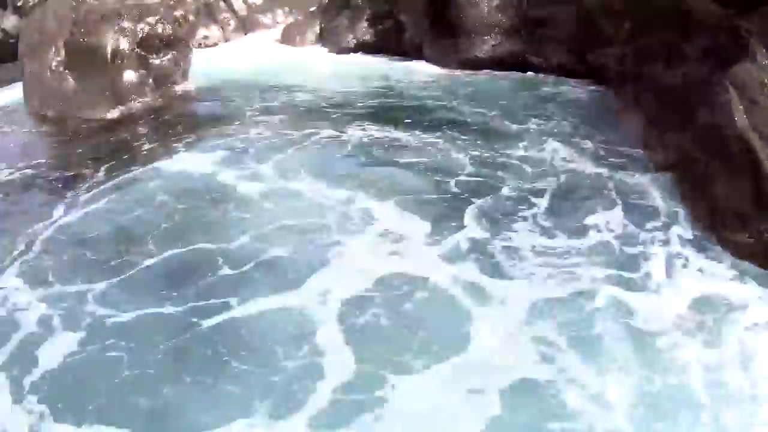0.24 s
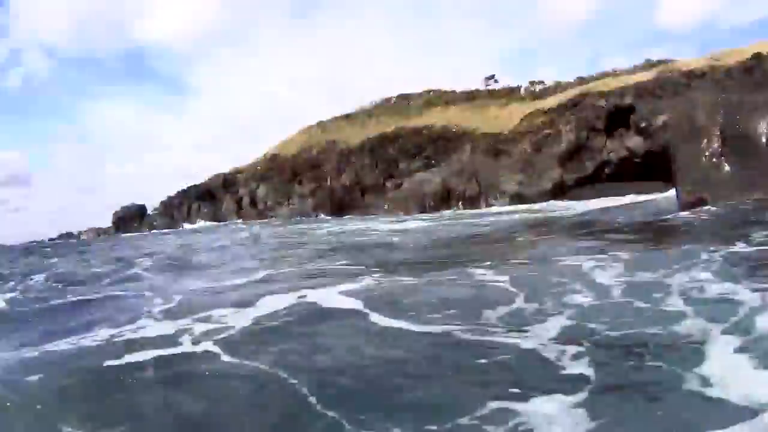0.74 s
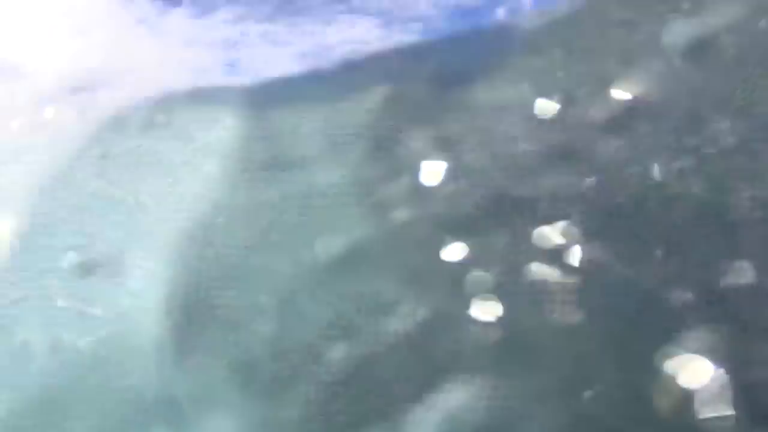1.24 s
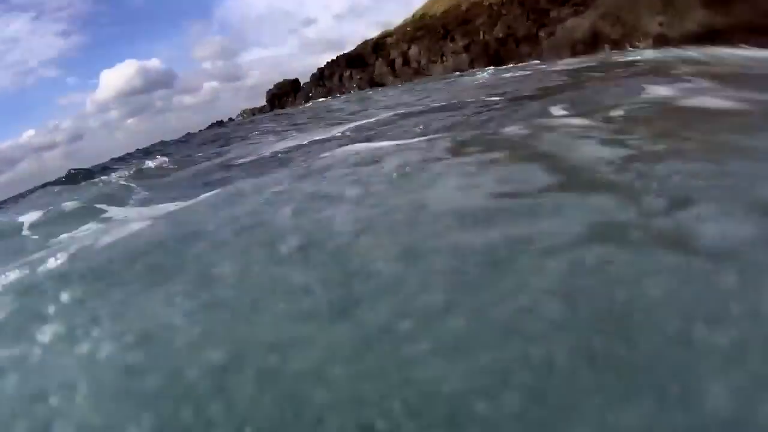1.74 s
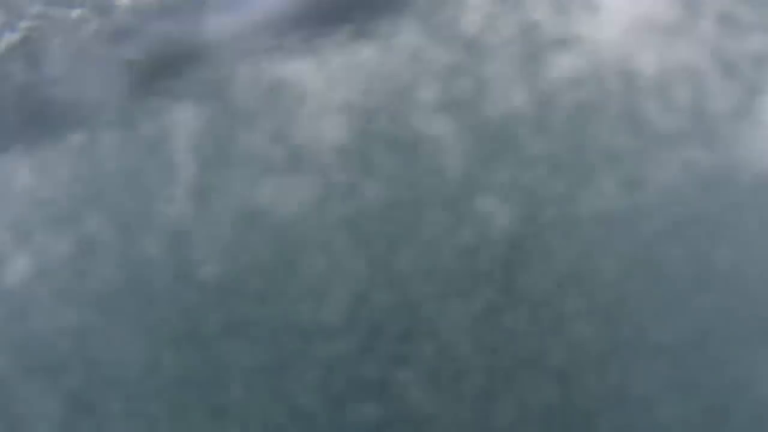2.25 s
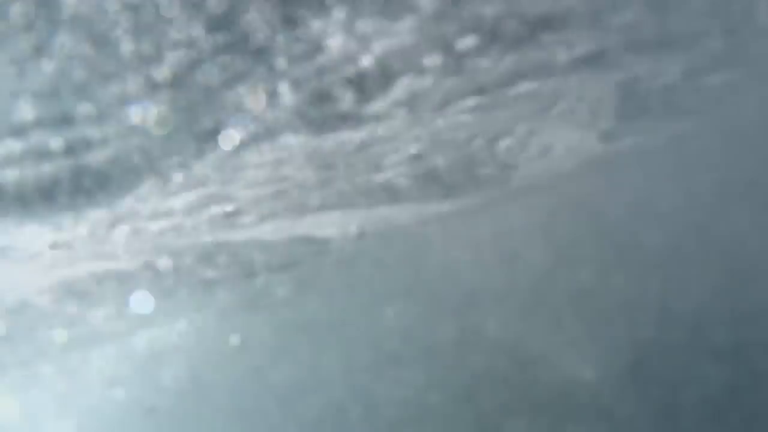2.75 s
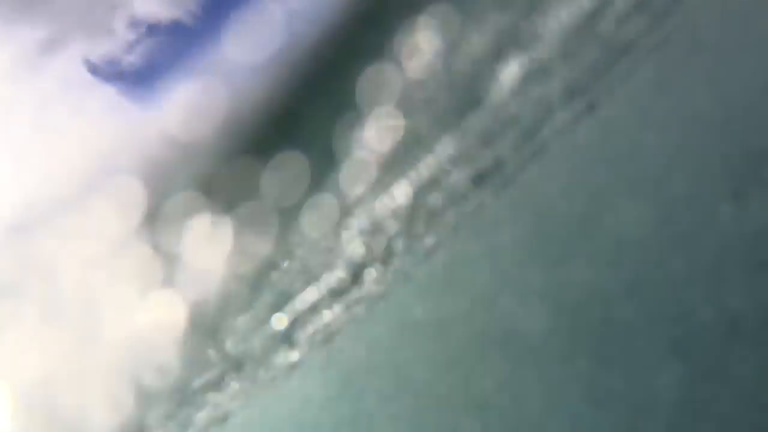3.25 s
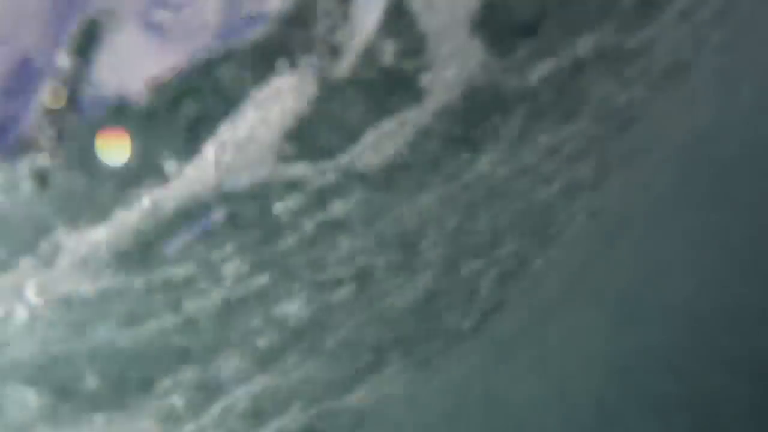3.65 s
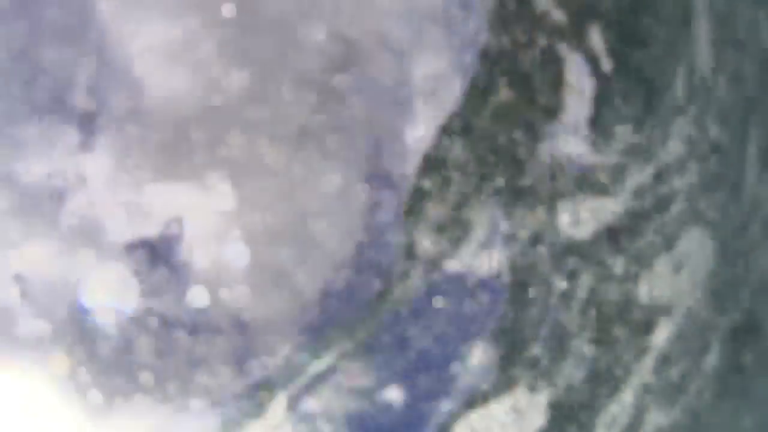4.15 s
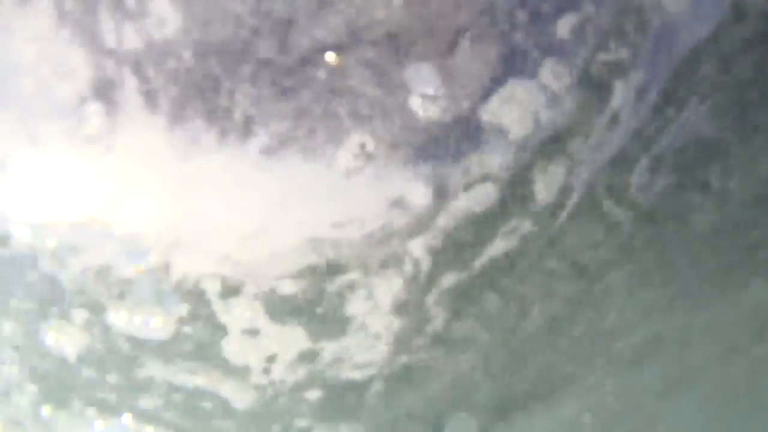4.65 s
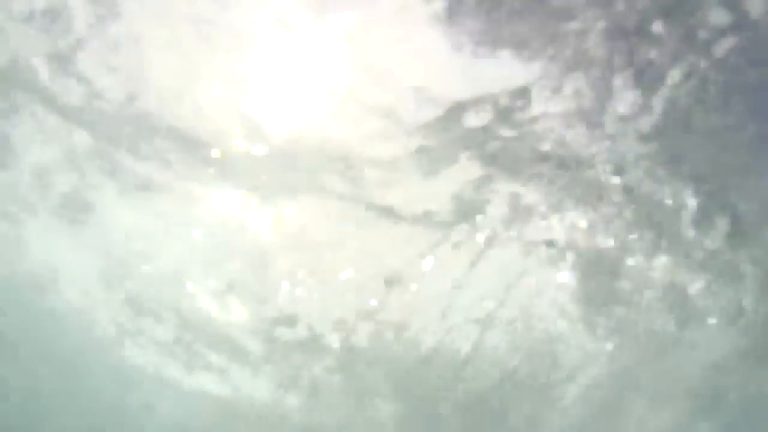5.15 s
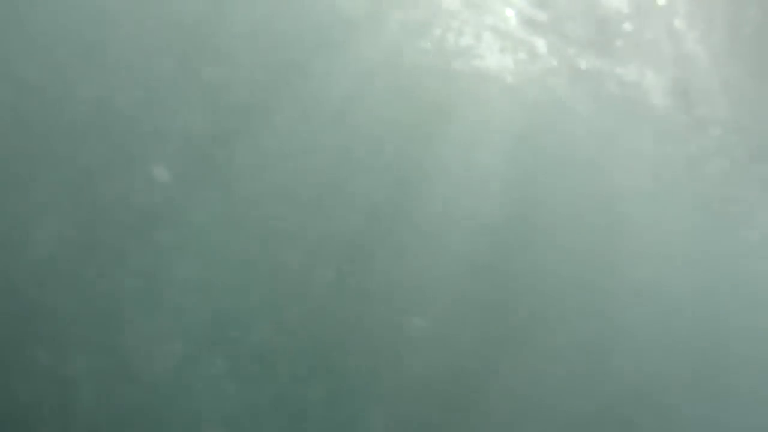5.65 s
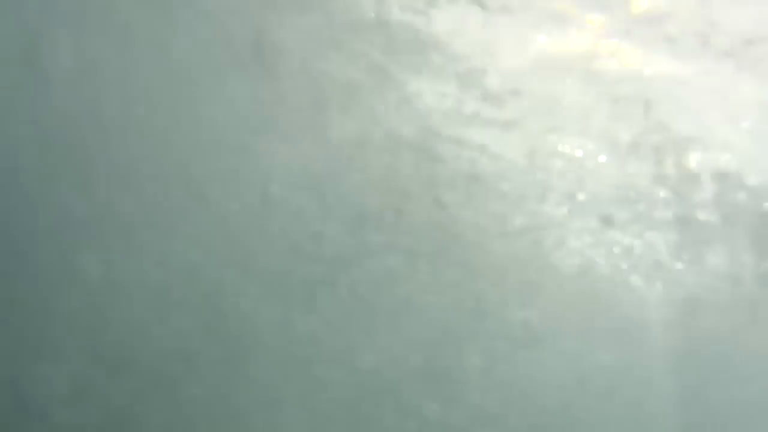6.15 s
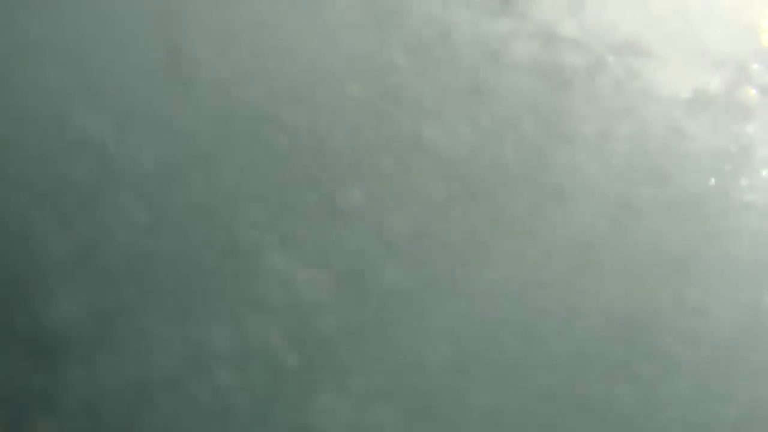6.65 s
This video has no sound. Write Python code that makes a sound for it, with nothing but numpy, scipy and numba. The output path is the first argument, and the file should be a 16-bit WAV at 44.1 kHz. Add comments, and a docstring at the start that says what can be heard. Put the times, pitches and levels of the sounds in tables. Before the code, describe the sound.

Surf hisses over rocks with soft thuds and drop ticks, then a slap and bubbles plunge everything into muffled, booming, crackling underwater gurgle.

```python
"""Surf, then under the wave

Surf hisses over rocks, as filtered noise and impulses; wind and slops thud, drops of spray tick on a waterproof
case at the waterline. A wave slaps over it and it sinks in a string of bubbles, each a decaying sine.
Under water the churning foam booms through a resonance, the air trapped at the microphone port,
while small bubbles fizz and crack against the case as blips, filtered noise and ringing impulses."""
import sys
import numpy as np
from scipy import signal
from scipy.fft import rfft, irfft, next_fast_len
from scipy.io import wavfile
from scipy.ndimage import uniform_filter1d, minimum_filter1d
from numba import njit

SR = 44100
rng = np.random.default_rng(int(sys.argv[2]) if len(sys.argv) > 2 else 0)


def int16_out(signal):
    """Quantize to a 16-bit WAV file."""
    q = np.round(np.clip(np.atleast_2d(signal).T, -1, 1) * 32767)
    wavfile.write(sys.argv[1], SR, q.astype(np.int16))


N = 303849
T = np.arange(N) / SR  # time of every sample [s]
CLOSES_AGAIN_S = 1.8   # water closes over the port for good
PINCH_S = 0.0012       # time a bubble takes to pinch off

# fizz on the case: (time [s], relative body level [dB], relative sparkle level [dB])
FIZZ_LEVEL = [(1.2, -18, -30), (1.37, -30, -58), (1.5, -32, -47), (1.88, -39, -47), (2.06, -33, -55),
              (2.33, -41, -46), (2.65, -43, -45.5), (3.0, -39.5, -48.5), (3.17, -37, -42),
              (3.55, -35.5, -45), (3.85, -36.5, -45.5), (4.08, -44.5, -49), (5.0, -47, -51),
              (5.09, -35.5, -54.5), (5.27, -36, -53.5), (5.56, -47, -52), (6.02, -45.5, -48),
              (6.25, -47.5, -44), (6.89, -34.5, -45.5)]


def undb(db):
    """Decibels to gain."""
    return 10 ** (np.asarray(db) / 20)


def unit(x):
    """Scale to rms 1."""
    return x / np.sqrt(np.mean(x ** 2))


def curve(rows):
    """Each column of a (time [s], ..) table at every sample."""
    s, *columns = np.transpose(rows)
    return [np.interp(T, s, c) for c in columns]


def add(out, s, sound):
    """Mix a short sound in at time s."""
    i = max(int(s * SR), 0)
    out[..., i:i + sound.shape[-1]] += sound[..., :max(N - i, 0)]


def walk(rate):
    """Smooth chance with spread near 1, heading for a new value rate times a second."""
    steps = rng.standard_normal(4096)
    return 1.3 * np.interp(T * rate, np.arange(len(steps)), steps)


def colour(x, points, size=4096):
    """Minimum-phase filter with the given (frequency [Hz], gain [dB]) response."""
    hz, db = np.transpose(points)
    gain = undb(np.interp(np.log(np.fft.rfftfreq(size, 1 / SR) + 1), np.log(hz), db))
    # folding the cepstrum forward in time makes the filter causal
    cepstrum = irfft(np.log(gain))
    cepstrum[1:size // 2] *= 2
    cepstrum[size // 2 + 1:] = 0
    response = irfft(np.exp(rfft(cepstrum)))
    return np.apply_along_axis(lambda v: signal.fftconvolve(v, response)[:len(v)], -1, x)


@njit
def svf(x, g, k):
    """State-variable band-pass with a moving centre."""
    y, band, low = np.empty(len(x)), 0., 0.
    for i in range(len(x)):
        v = (band + g[i] * (x[i] + 1e-18 - low)) / (1 + g[i] * (g[i] + k))
        band, low, y[i] = 2 * v - band, low + 2 * g[i] * v, k * v
    return y


def ring(x, hz, q):
    """One resonance, gain 1 at its centre."""
    g = np.tan(np.pi * np.minimum(hz, SR / 3) / SR) * np.ones(x.shape[-1])
    return np.apply_along_axis(svf, -1, x, g, 1. / q)


def pops(rate, spread_db):
    """Random impulses, rate a second on average, with exponentially scattered dB sizes; rms 1."""
    chance = rng.random(N)
    size = np.minimum(rng.exponential(size=N), 4.5)
    return unit((chance < rate / SR) * undb(spread_db * size) * rng.choice([-1, 1], N))


def spread(mid, side):
    """Left and right from mid and side."""
    return np.array([mid + side, mid - side])


def bubble(hz, swell, decay, lag_s, rise=0.018):
    """A bubble swells as it pinches off, then rings down while its pitch bends by rise per decay (in cycles)."""
    cycles = np.arange(int((swell + 6 * decay) * SR / hz) + 2) * hz / SR
    age = np.maximum(cycles - swell, 0) / decay
    size = np.sin(np.pi / 2 * np.minimum(cycles / swell, 1)) ** 2 * np.exp(-age)
    phase = np.cumsum(1 + rise * age) * hz / SR
    lead = np.tanh(2 * np.pi * hz * lag_s) / 2  # it reaches one microphone first
    return size * np.sin(spread(2 * np.pi * phase, lead))


def swarm(low_hz, high_hz, spread_db, cycles, lag_s, count):
    """Chance bubbles of every pitch in a range, a few cycles long, most of them faint; rms 1."""
    out = np.zeros((2, N))
    for when, pitch, size, life, side in rng.random((count, 5)):
        hz = low_hz * (high_hz / low_hz) ** pitch
        db = spread_db * min(-np.log(size), 4.5)
        swell = cycles * (.5 + life)
        plop = bubble(hz, swell, swell / 2, lag_s * (2 * side - 1))
        add(out, when * N / SR, undb(db) * plop)
    return unit(out)


def lift():
    """Troughs bring the case nearer the surface, so the pocket rings higher: its rise in octaves."""
    # wave troughs: (time [s], half length [s], rise [octaves])
    troughs = [(2.313, 0.084, 0.57), (3.054, 0.12, 0.27), (3.326, 0.16, 0.13)]
    return sum(octaves * np.exp(-((T - s) / half_s) ** 2) for s, half_s, octaves in troughs)


def port_pitch(closing_s=0.23, glide_s=0.031):
    """The air in the port rings high while open and low once sealed, settling lower as the case sinks."""
    open_hz, sealed_hz, deep_hz, settle_s = 1280, 546, 480, 1.22
    closes_s, drains_s = 1.37, 1.54  # water covers the port, then drains off once
    sealed, = curve([(closes_s - closing_s, 0), (closes_s, 1),
                     (drains_s - glide_s, 1), (drains_s, 0),
                     (CLOSES_AGAIN_S - glide_s, 0), (CLOSES_AGAIN_S, 1)])
    sinking = np.exp(-np.maximum(T - closes_s, 0) / settle_s)
    pocket_hz = deep_hz + (sealed_hz - deep_hz) * sinking
    return open_hz + sealed * (pocket_hz * 2 ** lift() - open_hz)


def surf(port_hz, left_db=-0.7):
    """Countless bursting bubbles on the rocks merge into a hiss that rings the port."""
    # spectrum of the hiss: (frequency [Hz], relative gain [dB])
    surf_colour = [(30, -22), (60, -31), (110, -24.5), (220, -15), (310, -19), (420, -14.5), (700, -14.5),
                   (1000, -17), (1350, -5.5), (1800, -8), (2050, -12.5), (2350, -6), (3500, -16),
                   (4750, -12.5), (7000, -24), (11000, -43.5)]
    # stereo width: (frequency [Hz], side minus mid [dB])
    surf_width = [(60, -21), (110, -22), (190, -23), (340, -28.5), (600, -11), (740, -9), (1110, -17),
                  (2100, -5), (3550, -12), (4600, -35.5), (6350, -9), (11400, -18.5)]
    # the surf is shut out as the wave covers the case: (time [s], relative level [dB])
    surf_level = [(0, -26.5), (.35, -31.5), (1.22, -30.5), (1.25, -37), (1.35, -29.5), (1.41, -91),
                  (2, -100)]
    mid, side = (rng.standard_normal(N) + 0.61 * pops(rate=2200, spread_db=4.0) for _ in range(2))
    hiss = colour(spread(mid, colour(side, surf_width)), surf_colour)
    hiss = hiss + 1.6 * ring(hiss, port_hz, q=18)
    waver_db = .8 * walk(18)
    level_db = curve(surf_level)[0] + waver_db
    return unit(hiss) * undb(spread(level_db, left_db / 2))


def fizz(body_db=-1, sparkle_db=-1, split_hz=2500):
    """Pitched blips over a soft wash of foam on the case; body and sparkle swell independently."""
    # tint of the foam: (frequency [Hz], relative gain [dB])
    fizz_colour = [(200, -5), (800, -0.5), (980, -1.5), (1150, -5), (1350, -3.5), (1560, -8), (1850, 3),
                   (2500, -7.5), (3000, -1), (3450, -5), (4000, 0), (5500, -14), (7600, -24.5),
                   (9200, -33.5), (11000, -48)]
    out = 0
    blips = swarm(low_hz=900, high_hz=7000, spread_db=3.4, cycles=3.8, lag_s=1.1e-4, count=3200)
    body_level_db, sparkle_level_db = curve(FIZZ_LEVEL)
    # filter, level [dB], stereo width, share of blips
    bands = [("low", body_level_db + body_db, .3, .55),
             ("high", sparkle_level_db + sparkle_db, .8, .85)]
    for kind, level_db, width, share in bands:
        mid, side = rng.standard_normal((2, N))
        foam = colour(share * blips + spread(mid, width * side), fizz_colour)
        foam = signal.sosfilt(signal.butter(4, split_hz, kind, fs=SR, output="sos"), foam)
        out = out + unit(foam) * undb(level_db + 2.0 * walk(40))
    return out * undb(1.4 * walk(70))


def crackle(level_db=-7):
    """Tiny bubbles plink against the case as short sines, louder where the fizz is thicker."""
    plinks = swarm(low_hz=1000, high_hz=4800, spread_db=2.2, cycles=4.5, lag_s=5e-5, count=130)
    return plinks * undb(level_db + np.mean(curve(FIZZ_LEVEL), axis=0))


def ticks(level_db=-7.5, rate=110, width=0.31, dull_hz=4800):
    """The nearest bubbles of the foam burst one by one, each an impulse that rings the case."""
    # resonances of the case: (frequency [Hz], Q, relative level [dB])
    case_modes = [(980, 9, 1), (1330, 9, -4.5), (1750, 5, 20.5), (2970, 15, 10), (3800, 21, 5.5)]
    taps = pops(rate=rate, spread_db=2.4)
    taps = spread(taps, width * taps * walk(200))
    out = sum(ring(taps * undb(db + 4 * walk(200)), hz, q=q) for hz, q, db in case_modes)
    out = signal.sosfilt(signal.butter(3, dull_hz, fs=SR, output="sos"), out)
    return unit(out) * undb(level_db + np.mean(curve(FIZZ_LEVEL), axis=0))


def churn_gain(throb_db=1.8, throb_rate=26):
    """The foam is driven by the first slap, then surges; it recedes in the troughs and throbs unevenly."""
    # churning foam: (time [s], relative level [dB])
    churn_level = [(1.67, -44), (1.95, -30.5), (2.7, -25), (3.35, -29), (3.8, -18), (4.3, -19.5),
                   (4.8, -18), (5.04, -19.5), (5.1, -13), (5.28, -11.5), (5.38, -16.5), (5.7, -22.5),
                   (5.87, -17.5), (5.98, -22), (6.25, -22.5), (6.43, -16), (6.55, -22), (6.72, -15.5),
                   (6.87, -9)]
    slap_s, slap_db, attack_s, release_s = 1.14, -22, .05, 0.23
    trough_db_per_octave = -22.5
    slap = np.exp(np.minimum((T - slap_s) / attack_s, (slap_s - T) / release_s))
    surge = undb(curve(churn_level)[0] + trough_db_per_octave * lift())
    return (surge + undb(slap_db) * slap) * undb(throb_db * walk(throb_rate))


def churn(port_hz, churn_db=-2.0, gurgle=0.87):
    """A cloud of large bubbles gurgles and drives the wobbling pocket of air trapped at the port."""
    # tint of the cloud: (frequency [Hz], relative gain [dB])
    cloud_colour = [(25, -56.5), (60, -36), (100, -17), (140, -12.5), (180, -10.5), (300, 0.5), (420, 10.5),
                    (600, 0), (750, -11), (1000, -41.5), (2000, -61)]
    wobble, trough_wobble = .03, .22  # shares of the pocket pitch: under water, and more per octave of lift
    push, side = (pops(rate=500, spread_db=2.0) + 0.48 * rng.standard_normal(N) for _ in range(2))
    push = spread(push, .07 * side)
    glugs = swarm(low_hz=175, high_hz=600, spread_db=2.1, cycles=4.5, lag_s=1e-4, count=480)
    rumble = unit(colour(push, cloud_colour))
    cloud = unit(rumble + gurgle * unit(colour(glugs, cloud_colour)))
    pocket_hz = port_hz * np.exp((wobble + trough_wobble * lift()) * walk(60))
    pocket = ring(ring(push, pocket_hz, q=13.4), pocket_hz, q=6.0)
    # share of the cloud beside the pocket; it closes in again as the water gets rougher
    nearness, = curve([(2.7, 0.67), (3.4, 0.48), (4.8, 0.78)])
    boom = nearness * cloud + 1.35 * unit(pocket)
    boom = boom / np.sqrt(uniform_filter1d(boom[0] ** 2, size=2600) + 1e-12)  # even out the loudness
    return boom * churn_gain() * undb(churn_db)


def single_plops(lag_s=5.5e-5, rough=0.74, calm_cycles=7):
    """A first knock on the case in air, then single bubbles: decaying sines that quiver, then ring clean."""
    # a knock in air, then bubbles large and small: (time [s], pitch [Hz], relative level [dB], decay [cycles])
    plop_list = [ (.008, 600, -18, 5.3), (1.203, 5700, -19, 8.4), (1.206, 1930, 3, 1.8),
                 (1.212, 5580, -11, 14), (1.211, 1212, 4, 7.9), (1.219, 4760, -12, 9),
                 (1.231, 1703, 7.5, 6.5), (1.239, 1320, 2, 2.9), (1.25, 1035, 3, 3.3), (1.255, 950, 0, 4.6),
                 (1.263, 750, -2, 4), (1.268, 990, -4, 5.5), (1.284, 1206, -4, 6.3), (1.298, 1830, -13, 6),
                 (1.273, 752, -8.5, 3.4), (1.312, 2430, -8, 4.6), (1.316, 880, -11, 3.2),
                 (1.324, 370, -15.5, 0.96), (1.331, 2940, -10, 2.7), (1.336, 3870, -15.5, 8.3),
                 (1.348, 2120, -4, 5.2), (1.356, 1545, -14.5, 17), (1.386, 3700, -13.5, 10),
                 (1.402, 2090, -10.5, 6.5), (1.405, 536, -14, 2.8), (1.422, 863, -12, 5.5),
                 (1.453, 1092, -20, 23), (1.463, 1890, -5, 5.4), (1.465, 616, -13.5, 3.9),
                 (1.527, 1370, -8.5, 5.5), (1.559, 2760, -15, 7.8), (1.806, 2590, -15, 7.6),
                 (1.805, 1296, -18, 19), (1.834, 1250, -12, 10.5), (1.8418, 3580, -9, 13),
                 (1.869, 700, -8.5, 1.5), (1.928, 1970, -2, 3.9), (1.947, 2950, -2, 4.3),
                 (1.946, 1200, -13, 15), (2.007, 3370, -16.5, 16), (2.014, 1614, -12, 9.4),
                 (2.013, 2750, -10.5, 5.3), (2.035, 3460, -16.5, 8.8), (2.482, 1850, -2, 2.3),
                 (2.528, 10760, -28, 17), (3.171, 830, -15.5, 2.9), (3.183, 740, -6.5, 0.86),
                 (2.789, 3060, -29, 7.4), (2.884, 3000, -24, 7.5), (3.223, 3050, -16.5, 7.7),
                 (3.865, 1327, -14, 9.3), (3.972, 1230, -22, 6.6), (4.069, 528, -9, 8.9),
                 (4.025, 328, -16.5, 4.3), (4.705, 278, -22.5, 7.1), (4.81, 178, -25.5, 10.3),
                 (5.07, 207, -32, 6.3), (5.05, 621, -13, 18), (5.077, 540, -7.5, 5.9),
                 (5.245, 226.5, -18.5, 8.5), (5.44, 1338, -13, 3.5), (5.461, 1270, -18, 3.5),
                 (5.85, 189, -26.5, 2.7), (6.09, 171, -25.5, 6.8), (6.64, 228, -24.5, 5),
                 (6.665, 3770, -15.5, 5.5)]
    pinch_cycles = 2.54  # the lowest pitches swell for at least this long
    out = np.zeros((2, N))
    for s, hz, db, decay in plop_list:
        chance = rng.standard_normal(512)
        plop = bubble(hz, max(PINCH_S * hz, pinch_cycles), decay, np.sign(chance[0]) * lag_s)
        steps = np.arange(len(chance))
        quiver = np.interp(T[:plop.shape[1]] * hz, steps, chance * np.exp(-steps / calm_cycles))
        add(out, s, undb(db) * plop * (1 + rough * quiver))
    return out


def buffets(length_s=0.00967):
    """Gusts and slops of water push on the port: short noise bursts through two low resonances."""
    # thuds: (time [s], peak level [dB])
    thuds = [(0.014, -42), (0.198, -36), (0.354, -38), (0.639, -33), (0.933, -31), (1.222, -20),
             (1.567, -26), (1.66, -35.5), (1.786, -19.5)]
    out, t = np.zeros(N), T[:SR // 10]
    for s, db in thuds:
        push = rng.standard_normal(len(t)) * t * np.exp(-t / length_s)
        thud = ring(ring(push, 175, q=1.4), 190, q=0.9)
        add(out, s - length_s, thud / abs(thud).max() * undb(db))
    return out


def drops():
    """Each drop of spray is an impulse on the case that rings the open port for a few cycles."""
    # drops: (time [s], relative level [dB])
    drop_list = [(0.196, -18), (0.279, -13), (0.551, -14), (0.573, -11.5), (0.732, -6), (0.886, -13),
                 (0.918, -16)]
    taps = np.zeros(N)
    for s, db in drop_list:
        add(taps, s, undb([db]))
    tick = ring(ring(taps, 1330, q=15.0), 1620, q=8.2)
    return tick / abs(tick).max() * taps.max()


def sweeps(width=0.48):
    """Foam brushes past: dense impulses through one resonance that swell and die away."""
    # sheets of foam: (start [s], end [s], relative level [dB], centre [Hz])
    sheets = [(1.194, 1.247, -24.5, 5940), (1.283, 1.366, -22, 2350), (2.002, 2.013, -21.5, 2800),
              (2.035, 2.105, -36.5, 3800), (2.239, 2.415, -33, 2470), (3.067, 3.143, -32, 1490),
              (3.263, 3.404, -40, 3340), (3.456, 3.536, -40, 1900), (3.711, 3.92, -31, 1460),
              (4.104, 4.28, -34.5, 1330), (4.394, 4.556, -28, 2200), (4.82, 4.88, -35, 1280),
              (5.033, 5.336, -35, 1620), (5.841, 6.017, -38, 1370), (6.503, 6.565, -30, 2900),
              (6.586, 6.753, -35.5, 1910)]
    # tint of the foam: (frequency [Hz], relative gain [dB])
    sweep_colour = [(150, -22.5), (600, 11.5), (1000, 7), (4000, -5.5), (5200, -13.5), (7000, -21),
                    (11000, -31.5)]
    out = np.zeros((2, N))
    foam = spread(pops(rate=8700, spread_db=-2.0), width * pops(rate=4600, spread_db=2.5))
    foam = colour(foam, sweep_colour) * undb(3.2 * walk(150))
    for start, end, db, hz in sheets:
        first = int(start * SR)
        last = max(int(end * SR), first + SR // 250)
        brush = unit(ring(foam[:, first:last], hz, q=1.23))
        add(out, start, brush * signal.windows.cosine(brush.shape[1]) * undb(db))
    return out


def plunges(decay_cycles=3, scatter_octaves=0.53, lag_s=6e-5, count=32):
    """Air dragged under with the case breaks into separate bubbles: small ones, then large, then small."""
    # plunges: (start [s], end [s], relative level [dB],
    #           typical pitch of the largest bubbles [Hz], of the smallest [Hz])
    plunge_list = [(1.212, 1.359, -20.5, 700, 2050), (1.807, 2.041, -40, 714, 2480)]
    collapse_share, collapse_width = 0.395, 0.255  # when the cavity collapses, as shares of the plunge
    out = np.zeros((2, N))
    for start, end, db, low_hz, high_hz in plunge_list:
        burst = np.zeros((2, N))
        for when, pitch, size, side in rng.random((count, 4)):
            collapse = np.exp(-((when - collapse_share) / collapse_width) ** 2)
            typical_hz = high_hz * (low_hz / high_hz) ** collapse
            hz = typical_hz * 2 ** (scatter_octaves * (2 * pitch - 1))
            plop = bubble(hz, PINCH_S * hz, decay_cycles, lag_s * (2 * side - 1))
            add(burst, start + when * (end - start), size * plop)
        # rms is taken over the whole scene, so scale it to the length of the plunge
        out += unit(burst) * np.sqrt((end - start) / T[-1]) * undb(db)
    return out


def chirps(swell_cycles=1, lag_s=5e-5):
    """A bubble breaks off abruptly; its pitch climbs as it nears the surface or sags as it is dragged down."""
    # chirps: (time [s], starting pitch [Hz], relative level [dB], decay [cycles], pitch rise per decay [share])
    chirp_list = [(1.281, 469, -5.5, 3.3, 0.16), (1.4215, 556, -1, 3.9, .04), (1.8856, 863, -5, 5, 0.19),
                  (1.91, 304, -11, 2.3, 0.069), (2.064, 513, -12.5, 8, .01), (2.132, 1414, -7, 12, -0.06)]
    out = np.zeros((2, N))
    for s, hz, db, decay, rise in chirp_list:
        add(out, s, undb(db) * bubble(hz, swell_cycles, decay, lag_s, rise))
    return out


def faint_cracks(count, decay_s=0.0041):
    """Chance cracks under water as (time [s], relative level [dB], centre [Hz], decay [s])."""
    typical_db, spread_db, typical_hz = -29, 3, 2400
    chance_cracks = []
    for when, size, pitch in rng.random((count, 3)):
        s = CLOSES_AGAIN_S + when * (T[-1] - CLOSES_AGAIN_S)
        db = typical_db + spread_db * (2 * size - 1)
        hz = typical_hz * 2 ** (2 * pitch - 1)
        chance_cracks.append((s, db, hz, decay_s))
    return chance_cracks


def cracks(crack_db=-3.5, spatter_s=0.0005, width=0.15, fragments=0.61):
    """A bubble collapses on the case: a snap, then its fragments rattle on around the same pitch."""
    # loud cracks: (time [s], relative level [dB], centre [Hz], decay of the fragments [s])
    loud_cracks = [(1.2964, -3, 2000, 0.0019), (1.307, -23, 1200, 0.0038), (1.329, -11, 2900, .002),
                   (1.351, -10, 2250, 0.0015), (1.36, -10.5, 1080, 0.0021), (1.364, 7, 1510, 0.0017),
                   (1.4036, -2.5, 1100, 0.0052), (1.452, -3.5, 1020, 0.0092), (1.457, -12, 3920, 0.00079),
                   (1.5265, -6.5, 1050, 0.0039), (1.8078, -4, 1670, 0.0013), (1.835, -11, 3400, 0.0024),
                   (1.8442, -3, 2200, 0.0017), (1.868, -5, 1490, 0.0069), (1.8853, -19, 1280, 0.0097),
                   (1.963, -4.5, 1580, 0.0024), (2.037, -11.5, 2400, 0.0021), (2.0663, -11, 1233, 0.0031),
                   (2.1108, -9, 2360, 0.0021), (2.1542, -17, 1830, 0.0055), (2.192, -18.5, 1700, 0.025),
                   (2.352, -23, 1850, 0.0032), (2.363, -19.5, 3080, 0.0034), (2.471, -17, 2600, 0.002),
                   (2.4818, -5.5, 1400, 0.0055), (2.528, -11, 3620, 0.0013), (2.5513, -10, 1550, 0.0046),
                   (2.629, -20.5, 3920, 0.0031), (2.696, -15, 1330, 0.0055), (2.752, -13, 1490, 0.0025),
                   (2.7756, -21, 2400, 0.0017), (2.8716, -14, 1640, 0.0041), (3.05, -17, 1720, 0.0032),
                   (2.924, -20.5, 1760, 0.0075), (3.015, -15.5, 1860, 0.00092), (3.091, -11, 1650, 0.0069),
                   (3.1028, -17, 1800, 0.0021), (3.1354, -14, 2230, .003), (3.1653, -12.5, 950, 0.0063),
                   (3.1839, -4.5, 1440, 0.0019), (3.234, -15.5, 2920, 0.0046), (3.258, -17, 1090, 0.004),
                   (3.334, -10, 780, 0.00079), (3.406, -7.5, 2730, 0.00024), (3.4958, -13, 1880, 0.0029),
                   (3.5182, -3, 1970, 0.0024), (3.553, -7.5, 1030, 0.006), (3.6003, -7, 1370, 0.0052),
                   (3.624, -17.5, 1210, 0.0028), (3.772, -18, 1800, .002), (3.8054, -20, 1250, 0.0061),
                   (4.201, -10, 2090, 0.0038), (4.457, -3.5, 1570, 0.00086), (4.489, -15, 1540, 0.017),
                   (4.496, -12.5, 2930, 0.0067), (4.52, -9, 1200, 0.0066), (4.544, -4.5, 1720, 0.0052),
                   (4.6408, -17, 1480, 0.0029), (4.841, -23, 985, 0.0086), (4.865, -8.5, 960, 0.0038),
                   (5.2682, -15.5, 1800, 0.0036), (5.353, -25, 1300, 0.0043), (5.404, -27, 4860, 0.0045),
                   (5.382, -16.5, 960, 0.0084), (5.441, -21, 1380, 0.0044), (5.46, -22, 1500, 0.0029),
                   (5.76, -21, 2450, 0.0024), (5.7848, -21, 4250, 0.002), (5.8617, -18, 2480, 0.0024),
                   (5.957, -15.5, 1830, 0.0006), (6.1708, -19.5, 3900, 0.0026), (6.2, -19.5, 1690, 0.0008),
                   (6.272, -18, 1830, .002), (6.3675, -18.5, 2190, 0.0016), (6.38, -20.5, 4540, .0015),
                   (6.522, -12.5, 1950, 0.0029), (6.53, -21, 2140, 0.0082), (6.722, -20, 3150, 0.0041),
                   (6.731, -16, 2200, 0.0017)]
    # tint of a crack: (frequency [Hz], relative gain [dB])
    crack_colour = [(100, -16), (500, 16.5), (1000, 7.5), (1850, 11.5), (2400, 1.5), (3000, 9), (4300, 5),
                    (5600, -4.5), (7500, -11), (11000, -21)]
    out, t = np.zeros((2, N)), T[:SR // 20]
    for s, db, hz, decay_s in loud_cracks + faint_cracks(count=18):
        mid, side, rattle = rng.standard_normal((3, len(t)))
        burst = t / spatter_s * np.exp(-t / spatter_s)
        rattle = rattle * (1 - np.exp(-t / spatter_s)) * np.exp(-t / decay_s)
        mid = mid * burst + fragments * ring(rattle, hz, q=0.95)
        mid[int(2 * spatter_s * SR)] += 1.3  # the snap
        crack = colour(ring(spread(mid, width * side * burst), hz, q=1.2), crack_colour)
        add(out, s, crack / abs(crack.mean(axis=0)).max() * undb(db + crack_db))
    return out


def gulps(port_hz, swell_cycles=3, decay_cycles=4, lag_s=3e-5, rise=0.023, scatter_octaves=0.048):
    """Big gulps of air thump the pocket: sines near its pitch that swell, bend up and die away."""
    # gulps: (time [s], relative level [dB])
    gulp_list = [(2.133, -16), (2.549, -15), (2.669, -12.5), (2.925, -16.5), (3.172, -19), (3.557, -8.5),
                 (3.608, -15), (3.749, -10), (3.779, -0.5), (3.852, -16), (3.96, -9.5), (4.029, -9),
                 (4.222, -10), (4.297, -15), (4.392, -18), (4.448, -12), (4.557, -8), (4.663, 6.5),
                 (4.741, -6.5), (4.817, -5), (4.92, -13), (5.105, -5), (5.192, -7.5), (5.251, -8),
                 (5.375, -11), (5.473, -10), (5.742, -11.5), (5.825, -16), (5.857, -7.5), (5.897, -10),
                 (6.118, -15), (6.187, -13), (6.248, -12.5), (6.318, -9), (6.39, -20.5), (6.462, -11.5),
                 (6.557, -9), (6.642, -8), (6.73, -7.5)]
    out = np.zeros((2, N))
    for (s, db), detune in zip(gulp_list, rng.standard_normal(len(gulp_list))):
        hz = port_hz[int(s * SR)] * 2 ** (scatter_octaves * detune) / (1 + rise)
        add(out, s, undb(db) * bubble(hz, swell_cycles, decay_cycles, lag_s, rise))
    return out


def flex(x):
    """The case flexes at one pitch and shakes the microphones out of step; around it the left one leads."""
    # stereo width under water: (frequency [Hz], gain of the side [dB])
    water_width = [(150, -13.5), (350, -21.5), (600, -2.5), (1300, -2), (1850, -21.5), (2500, -8.5),
                   (3700, 2), (4800, 1), (7000, -3)]
    flex_hz, flex_q, flex_side = 4030, 1.3, 0.084
    mid, side = x.mean(axis=0), (x[0] - x[1]) / 2
    shake = np.gradient(ring(mid, flex_hz, q=flex_q)) * SR / (2 * np.pi * flex_hz)
    hz, db = np.transpose(water_width)
    size = next_fast_len(N)
    width = undb(np.interp(np.log(np.fft.rfftfreq(size, 1 / SR) + 1), np.log(hz), db))
    return spread(mid, irfft(rfft(side + flex_side * shake, size) * width, size)[:N])


def scene():
    """Open air until the wave arrives, then water all around."""
    port_hz = port_pitch()
    wet, = curve([(1.2, 0.092), (1.225, 1)])  # foam stays faint until the wave arrives
    knocks = cracks() + sweeps() + wet * (fizz() + crackle() + ticks())
    knocks = knocks + 1.2 * ring(knocks, port_hz, q=27)  # whatever strikes the case leaves the port ringing
    plops = plunges() + single_plops() + chirps() + gulps(port_hz)
    struck = plops + knocks + wet * churn(port_hz)
    return surf(port_hz) + buffets() + drops() + flex(struck)


def record(dry, ceiling=0.65, top_hz=11200):
    """Each microphone has its own colour; a fast limiter holds the loudest peaks down; the top is cut."""
    # the two microphones differ: (frequency [Hz], left minus right [dB])
    mic_balance = [(110, .2), (340, 0), (620, -1), (1110, -2.2), (2000, -1.3), (3550, -.5), (6350, .5)]
    heard = np.array([colour(x, [(hz, sign * db / 2) for hz, db in mic_balance])
                      for x, sign in zip(dry, (1, -1))])
    headroom = np.minimum(1, ceiling / (abs(heard).max(axis=0) + 1e-9))
    gain = uniform_filter1d(minimum_filter1d(headroom, size=120), size=120)
    return signal.sosfilt(signal.ellip(8, .2, 70, top_hz, fs=SR, output="sos"), heard * gain)


dry = scene()
out = record(dry)
int16_out(out)
```